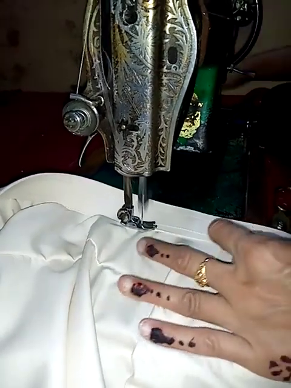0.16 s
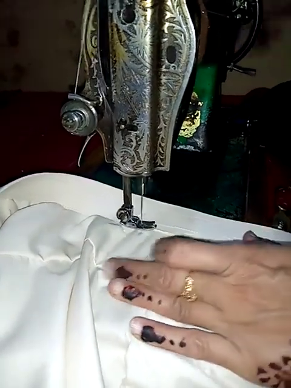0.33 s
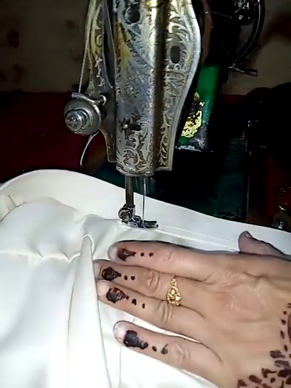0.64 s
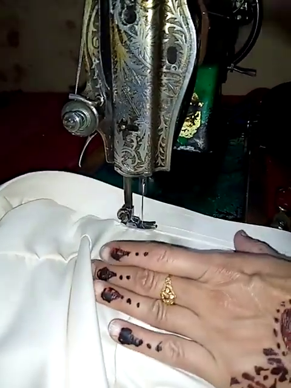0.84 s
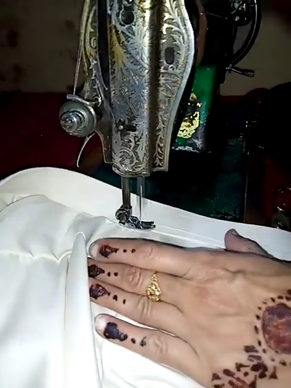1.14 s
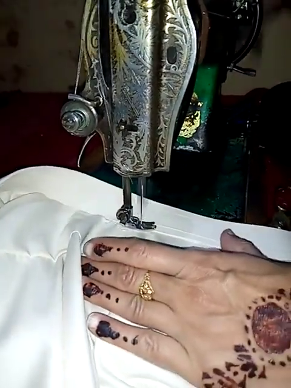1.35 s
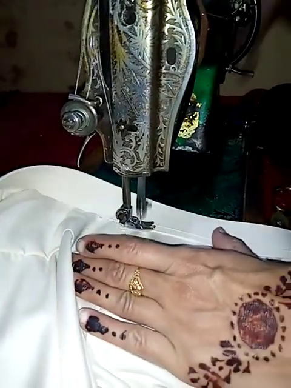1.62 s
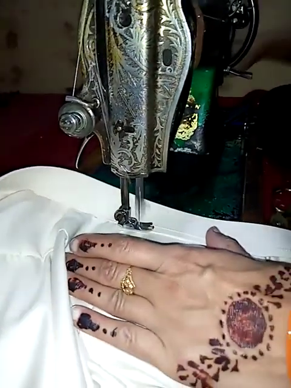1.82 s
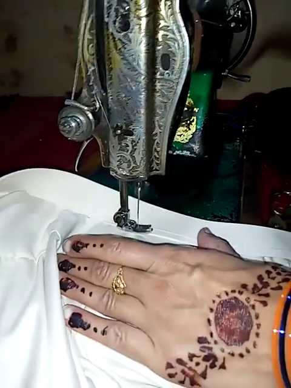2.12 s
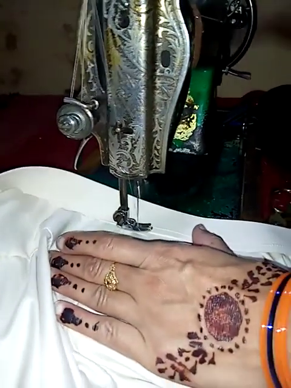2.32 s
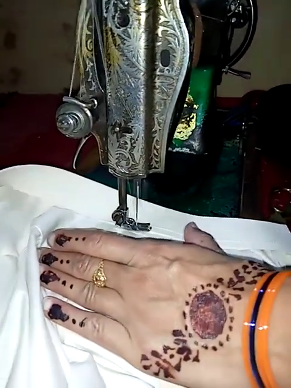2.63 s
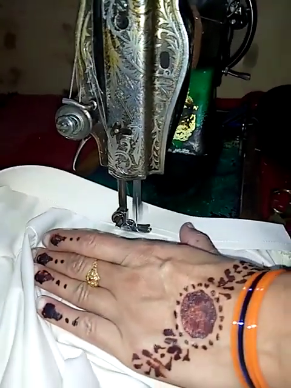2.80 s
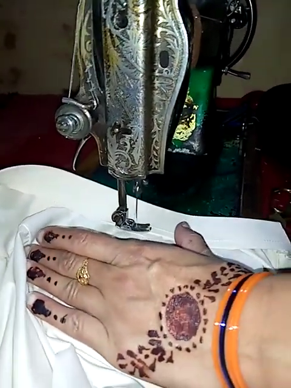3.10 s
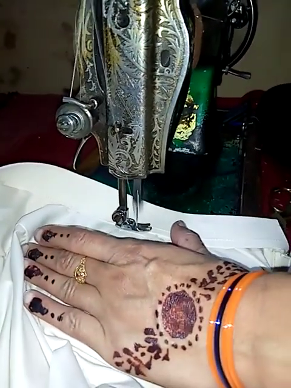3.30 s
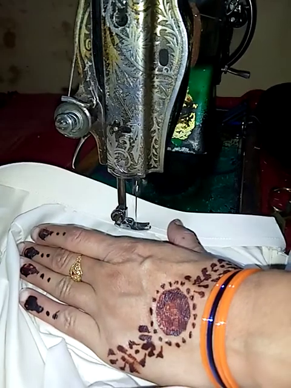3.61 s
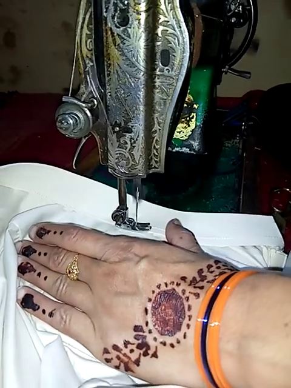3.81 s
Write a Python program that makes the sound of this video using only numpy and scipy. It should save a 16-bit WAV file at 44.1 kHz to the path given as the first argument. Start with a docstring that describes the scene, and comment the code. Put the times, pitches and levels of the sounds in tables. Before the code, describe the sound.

Sewing machine stitching close up: rapid metallic clicking and knocking that gathers pace, then winds down

```python
"""A faint rattle and low drone come first, with soft knocks: an old cast-iron sewing machine on a wooden table.
Heard close up, it gathers speed to between ten and eleven stitches a second, then slows and stops.
In each stitch the linkage clacks, the needle bar and shuttle click and the feed knocks the table;
now and then a loose steel part rings. Blows are bursts of random touches, coloured by filters and
joined by fading tones; the bearings' rattle and the table's drone are filtered noise."""
import sys
import numpy as np
from scipy import signal
from scipy.fft import rfft, irfft
from scipy.io import wavfile

SR = 44100
rng = np.random.default_rng(int(sys.argv[2]) if len(sys.argv) > 2 else 0)


def log_audio(samples):
    """Write samples as a 16-bit WAV file to the path given in sys.argv[1]."""
    # one column per channel
    frames = np.atleast_2d(samples).T
    # limit to full scale, then quantise
    limited = np.clip(frames, -1, 1)
    pcm = np.round(limited * 32767).astype(np.int16)
    wavfile.write(sys.argv[1], SR, pcm)


N = 174195  # length in samples, just under 4 s

# Blow levels below are inputs: each function adds its own trim in dB.
# Steel clicks of needle bar and shuttle, about two a stitch: start_s [s], treble_db [dB], body_db [dB]
CLICK_EVENTS = [(0.3633, -14.5, -29), (0.584, -34, -41), (0.6319, -12.5, -26.5), (0.668, -24, -39.5),
                (0.689, -19.5, -32), (0.7453, -6.5, -28.5), (0.7898, -16.5, -33.5), (0.8622, -9.5, -26.5),
                (0.9205, -15.5, -35.5), (0.9717, -10.5, -28.5), (1.0224, -14.5, -32), (1.075, -9.5, -26),
                (1.1291, -11, -33.5), (1.181, -9.5, -50), (1.233, -14.5, -30), (1.283, -9, -28),
                (1.331, -13.5, -30), (1.3807, -12, -27), (1.431, -10, -34), (1.48, -12.5, -28),
                (1.5313, -12, -29.5), (1.5752, -16.5, -32.5), (1.6242, -14, -31), (1.6713, -8.5, -28.5),
                (1.72, -10, -30), (1.767, -7, -30), (1.8164, -10.5, -30), (1.8595, -14.5, -29.5),
                (1.89, -17.5, -32.5), (1.9054, -15.5, -29), (1.9509, -13.5, -28.5), (1.999, -9.5, -32),
                (2.0468, -12.5, -28), (2.0953, -12, -33), (2.141, -13, -34), (2.1857, -11.5, -35.5),
                (2.233, -11.5, -28), (2.281, -14.5, -30), (2.3274, -11, -28.5), (2.3753, -13, -33),
                (2.4229, -14.5, -25.5), (2.4736, -17, -31.5), (2.521, -10, -31.5), (2.573, -10.5, -34),
                (2.6261, -9, -27.5), (2.6819, -14.5, -37), (2.7366, -10.5, -26), (2.7965, -13, -38),
                (2.921, -19, -37), (3.2794, -39, -36), (3.38, -43, -39), (3.423, -39, -45),
                (3.454, -38, -39), (3.648, -36, -39.5), (3.747, -42, -42.5), (3.909, -40, -43)]
# The feed knocking on the bed, about once a stitch: start_s [s], knock_db [dB], rattle_db [dB]
KNOCK_EVENTS = [(0.055, -37, -39), (0.073, -57, -36), (0.139, -35, -61), (0.227, -24, -29.5),
                (0.372, -30.5, -39), (0.501, -32, -40), (0.512, -46, -34.5), (0.633, -24.5, -26.5),
                (0.754, -29, -34), (0.872, -36, -40), (0.973, -26, -28.5), (1.081, -28, -41),
                (1.18, -33, -27.5), (1.285, -27.5, -28.5), (1.39, -30.5, -31.5), (1.482, -31.5, -28.5),
                (1.58, -26.5, -27.5), (1.677, -30.5, -29), (1.777, -30.5, -29), (1.863, -26.5, -30.5),
                (1.951, -37, -37), (2.053, -33, -30), (2.143, -26, -27.5), (2.238, -29, -31),
                (2.329, -40, -26), (2.428, -29.5, -39.5), (2.527, -29.5, -34), (2.662, -34, -30.5),
                (2.743, -30.5, -37), (2.863, -30.5, -38), (2.99, -28.5, -36), (3.128, -26, -35),
                (3.285, -30, -42), (3.462, -35.5, -39), (3.519, -38.5, -38.5), (3.662, -31.5, -38.5),
                (3.799, -49, -48.5), (3.917, -34, -42.5)]
# Ringing tones of the machine's head: pitch_hz [Hz], level_db [dB], t60_s [s to fall by 60 dB]
HEAD_TONES = [(1212,7,0.11),(2307,2,0.08),(3123,5,0.033),(4210,6,0.05),(5835,3,0.3),(6400,1,0.04)]


def from_db(db):
    """Turn decibels into an amplitude gain."""
    return 10 ** (np.asarray(db) / 20)


def rms_one(x):
    """Scale a signal to an rms (average strength) of 1."""
    return x / np.sqrt(np.mean(x ** 2) + 1e-20)


def level(rows):
    """Draw a gain over time through (start_s, level_db) points."""
    return from_db(np.interp(np.arange(N) / SR, *np.transpose(rows)))


def body(x, colour, modes=(), size=16384):
    """Pass x through a part with a broad colour and ringing modes; the filter's overall power gain is 1."""
    hz, db = np.transpose(colour)
    grid_hz = np.maximum(np.arange(size // 2 + 1) * SR / size, 1)
    colour_gain = from_db(np.interp(np.log(grid_hz), np.log(hz), db))
    # Folding the cepstrum (spectrum of the log spectrum) makes the filter respond only after a blow
    cepstrum = irfft(np.log(colour_gain))
    cepstrum[1:size // 2] *= 2
    cepstrum[size // 2 + 1:] = 0
    contact = irfft(np.exp(rfft(cepstrum)))
    response = contact
    for mode_hz, mode_db, t60_s in modes:
        r = np.exp(-np.log(1000) / (t60_s * SR))  # fading per sample
        poles = [1, -2 * r * np.cos(2 * np.pi * mode_hz / SR), r * r]
        ringing = (1 - r * r) / 2 * signal.lfilter([1, 0, -1], poles, contact)
        response = response + from_db(mode_db) * ringing
    return signal.fftconvolve(x, response / np.linalg.norm(response))[:N]


def blows(times, db, attack_s, hold_s, decay_s, tail_db, tail_s):
    """Each blow is a short burst of dense contact chatter, with a diffuse tail from frame and room."""
    touches_per_s = 9000  # tiny touches within a blow
    t = np.arange(SR // 3) / SR
    rise = np.minimum(t / attack_s, 1) ** 2
    late = np.maximum(t - attack_s - hold_s, 0)
    burst = np.exp(-2 * late / decay_s)
    tail = from_db(tail_db) ** 2 * np.exp(-2 * t / tail_s)
    shape = rise * (burst + tail)  # power, so overlapping blows add naturally
    power = np.zeros(N + SR)
    for s, gain in zip(times, from_db(db)):
        start = max(int(s * SR), 0)
        power[start:start + len(t)] += gain ** 2 * shape
    touches = (rng.random(N) < touches_per_s / SR) * rng.choice([-1, 1], N)
    return np.sqrt(power[:N]) * rms_one(touches)


def sing(times, db, modes, wander=0):
    """Each blow rings every mode with a strength of its own; wander is the typical pitch stray as a share."""
    strength_spread_db, rise_s = 2.5, .003
    hz, mode_db, t60_s = np.transpose(modes)[:, :, None]
    t = np.arange(int(t60_s.max() * SR)) / SR
    out = np.zeros(N + SR)
    for s, blow_db in zip(times, db):
        strength, stray, phase = rng.standard_normal((3, len(modes), 1))
        fade = np.exp(-np.log(1000) * t / t60_s)
        gain = from_db(blow_db + mode_db + strength_spread_db * strength) * fade
        tones = gain * np.sin(2 * np.pi * (hz * (1 + wander * stray) * t + phase))
        start = max(int(s * SR), 0)
        out[start:start + len(t)] += tones.sum(0) * np.minimum(t / rise_s, 1)
    return out[:N]


def judder():
    """Small parts bounce, so their rattle comes in quick uneven clumps: a gain of rms 1."""
    spread_db, points_per_s = 3, 330
    points = rng.standard_normal(int(N / SR * points_per_s) + 2)
    wobble = np.interp(np.arange(N) / SR * points_per_s, np.arange(len(points)), points)
    return rms_one(from_db(spread_db * wobble))


def running():
    """Bearings rub and tick faintly; the table drones with the shaking of the machine."""
    # How strong the bearings' rattle and the table's drone are, before trim: start_s [s], level_db [dB]
    bearing_levels = [(0,-57),(.2,-50),(.3,-46.5),(.6,-46.5),(.9,-43.5),(2.4,-40),(3.1,-46),(3.42,-54),(3.62,-53),(3.72,-59),(3.8,-61),(3.95,-57.5)]
    drone_levels = [(0,-60.5),(.22,-49),(1,-45.5),(2.3,-44.5),(3.1,-48),(3.55,-53),(3.82,-62)]
    # Their colours: pitch_hz [Hz], level_db [dB]
    bearing_colour = [(450,-8.5),(600,1.5),(800,-3.5),(1500,-1),(2200,1.5),(3000,-3.5),(5000,-1),(6600,-2),(7700,-16.5),(9600,-9.5),(13300,-16),(15200,-10),(16200,-24)]
    drone_colour = [(50,-33),(85,-34),(108,-6.5),(145,-9.5),(220,-5.5),(310,3),(440,-6.5),(560,-4.5),(800,-28),(2000,-43.5)]
    bearing_trim_db, drone_trim_db = 1, -0.5
    ticks_per_s, tick_spread_db, tick_top_db = 280, 9, 11
    tick_share = 0.47  # ticks' share of the power; smooth noise makes up the rest

    tick_db = np.minimum(tick_spread_db * rng.exponential(1, N), tick_top_db)
    born = np.flatnonzero(rng.random(N) < ticks_per_s / SR)
    ticks = blows(born / SR, tick_db[born], attack_s=0.00033, hold_s=0.00025,
                  decay_s=0.0085, tail_db=-9, tail_s=0.0074)
    smooth = rng.standard_normal(N)
    rub = np.sqrt(tick_share) * rms_one(ticks) + np.sqrt(1 - tick_share) * smooth
    bearings = body(rub * judder() * level(bearing_levels), bearing_colour, HEAD_TONES)
    drone = body(rng.standard_normal(N) * level(drone_levels), drone_colour)
    return from_db(bearing_trim_db) * bearings + from_db(drone_trim_db) * drone


def knocks():
    """The feed strikes the bed, sets it ringing and shakes the small parts on it."""
    # Colours of the knock and of the shaken parts: pitch_hz [Hz], level_db [dB]
    knock_colour = [(120,-24),(430,-5),(570,7.5),(740,-9),(1000,0.5),(1250,0.5),(1450,-12),(2200,-1),(3500,-6.5),(8000,-37)]
    rattle_colour = [(1000,-25),(2200,5),(3200,5),(4600,6),(5300,-1),(6700,6),(7600,-6),(9500,-4.5),(13500,-6),(15300,2),(16200,-29)]
    # Ringing tones of the bed: pitch_hz [Hz], level_db [dB, before trim], t60_s [s]
    bed_tones = [(485,-16.5,.17),(601,-14,.13),(1216,-15,.17),(1268,-17,.085),(2110,-17,.06),(2320,-20,.05)]
    bed_trim_db = 0.5

    s, knock_db, rattle_db = np.transpose(KNOCK_EVENTS)
    knock = blows(s, knock_db - 8, attack_s=0.0016, hold_s=0.0018,
                  decay_s=0.012, tail_db=-17.0, tail_s=0.11)
    rattle = blows(s, rattle_db - 2.0, attack_s=0.00034, hold_s=0.00088,
                   decay_s=0.011, tail_db=-8.0, tail_s=0.038)
    bed = body(knock, knock_colour) + sing(s, knock_db + bed_trim_db, bed_tones)
    return bed + body(rattle * judder(), rattle_colour)


def table():
    """Each feed knock and each click gives the table top one soft push, so it throbs with the stitches."""
    # Boom relative to each knock, heavier as the machine slows: start_s [s], level_db [dB, before trim]
    boom_levels = [(.2,-10),(.7,-9),(1,-6),(2.6,-5),(3.0,-4),(3.13,1),(3.29,2),(3.46,8),(3.66,-5)]
    # Colour of the thud: pitch_hz [Hz], level_db [dB]
    thud_colour = [(100,-10.5),(290,-4),(420,-7.5),(900,-16)]
    # Ringing tones of the table, then its lowest one, reached only by the feed:
    # pitch_hz [Hz], level_db [dB], t60_s [s]
    table_tones = [(296,19,0.16),(320,22,0.18),(349,20.5,0.28),(383,22.5,0.26)]
    boom_tone = [(272,-8.5,.2)]
    click_push_db, knock_push_db = 14.5, 11.5

    push = np.zeros(N)
    s, _, click_db = np.transpose(CLICK_EVENTS)
    # Clicks push up or down at random; knocks always push the same way
    push[(s * SR).astype(int)] += from_db(click_db + click_push_db) * rng.choice([-1, 1], len(s))
    s, knock_db, _ = np.transpose(KNOCK_EVENTS)
    boom_db = knock_db + np.interp(s, *np.transpose(boom_levels))
    push[(s * SR).astype(int)] += from_db(boom_db + knock_push_db)
    return body(push, thud_colour, table_tones) + sing(s, boom_db, boom_tone)


def clacks():
    """The linkage takes up its play with a short hollow clack, pitched a little differently each time."""
    # Play is taken up before and after the stroke: start_s [s], level_db [dB, before trim]
    clack_events = [(0.1673, -25.5), (0.309, -28), (0.3436, -22.5), (0.3705, -18.5), (0.485, -29.5),
                    (0.6425, -16), (0.7287, -23), (0.7537, -21), (0.847, -25), (0.872, -18), (0.9587, -24),
                    (0.9816, -20.5), (1.0606, -19.5), (1.167, -20), (1.188, -16.5), (1.27, -22),
                    (1.291, -21), (1.367, -18.5), (1.3862, -22.5), (1.467, -24.5), (1.5645, -18),
                    (1.5867, -21), (1.658, -20.5), (1.754, -19.5), (1.775, -17), (1.8473, -16.5),
                    (1.939, -17.5), (2.0328, -18.5), (2.054, -26), (2.127, -14), (2.2191, -13.5),
                    (2.313, -21), (2.409, -23), (2.507, -23), (2.611, -24), (2.7205, -23), (2.7455, -24),
                    (2.839, -24), (2.9658, -25), (3.1034, -21.5), (3.25, -37), (3.4474, -28.5),
                    (3.571, -34)]
    # Colour of the contact: pitch_hz [Hz], level_db [dB]
    clack_colour = [(300,-26.5),(650,-1.5),(1400,-19),(1950,-11.5),(2250,-5.5),(2850,-3.5),(3200,6.5),(3700,-16.5),(4200,-3.5),(5400,-20.5),(6600,-4.5),(8000,-18),(15000,-17.5)]
    # Ringing tones of the linkage: pitch_hz [Hz], level_db [dB, before trim], t60_s [s]
    link_tones = [(2160,-16,.022),(2370,-18,.022),(2760,-15,.018),(2900,-13,.024),(4230,-17,.02)]
    link_trim_db = 8

    s, db = np.transpose(clack_events)
    contact = blows(s, db - 13, attack_s=0.0013, hold_s=0.0015,
                    decay_s=0.0034, tail_db=-9.5, tail_s=0.011)
    return body(contact, clack_colour) + sing(s, db + link_trim_db, link_tones, wander=.025)


def clicks():
    """Steel meets steel: a very short bright snap and a slightly longer answer from the head."""
    # Colours of the snap and of the answer: pitch_hz [Hz], level_db [dB]
    snap_colour = [(3000,-17),(8000,-18),(8500,-9),(8900,-16),(9350,-3.5),(10400,-2),(11000,-8.5),(12100,-10),(12600,-4.5),(13800,-20),(14400,-8),(15500,-7),(16000,-21)]
    answer_colour = [(100,-35),(600,1),(1600,-8.5),(2300,-3),(3100,3.5),(3700,-2),(4200,-3.5),(5400,-5.5),(6450,4),(7400,-14),(10000,-28.5)]
    # Ringing tones of the shuttle: pitch_hz [Hz], level_db [dB], t60_s [s]
    shuttle_tones = [(9370,1,0.03),(10686,-1,0.05)]

    s, treble_db, body_db = np.transpose(CLICK_EVENTS)
    snap = blows(s, treble_db - 12, attack_s=0.00069, hold_s=0.00082,
                 decay_s=0.0024, tail_db=-14, tail_s=0.019)
    answer = blows(s, body_db - 2, attack_s=0.0012, hold_s=0.00054,
                   decay_s=0.0086, tail_db=-7.5, tail_s=0.0083)
    return body(snap, snap_colour, shuttle_tones) + body(answer, answer_colour, HEAD_TONES)


def rings():
    """The loose steel part is struck, falls back once and sings on in its ringing modes."""
    # Strikes on the loose part: start_s [s], level_db [dB, before trim]
    ring_events = [(0.4225, -20), (0.7995, -20), (1.117, -18.5), (1.4226, -19), (1.71, -18.5),
                   (1.9893, -18.5), (2.271, -17), (2.4613, -18), (2.5625, -19.5), (2.6613, -19),
                   (2.783, -19.5), (2.908, -21), (3.03, -17), (3.189, -25.5), (3.3485, -22), (3.5157, -23)]
    # Colour of the strike: pitch_hz [Hz], level_db [dB]
    ring_colour = [(150,-33.5),(600,-8),(1500,-13),(3800,-6),(5400,-4.5),(6500,-4),(8000,-15),(10700,-12),(11200,3.5),(11800,-12.5),(13900,-20),(14280,1),(14520,4),(14830,4.5),(15200,-5),(15600,-5),(16100,-18)]
    # Ringing tones of the loose steel: pitch_hz [Hz], level_db [dB, before trim], t60_s [s]
    steel_tones = [(3750,-27,.26),(4595,-28,.27),(5836,-26.5,.28),(11115,-26,.22),(11300,-25,.24),(14215,-25,.22),(14280,-25,.15),(14745,-24,.18),(14838,-23.5,.2)]
    bounce_s, bounce_db, steel_trim_db = 0.0126, -9, 1.5

    s, db = np.transpose(ring_events)
    strike_s = np.r_[s, s + bounce_s]
    strike_db = np.r_[db, db + bounce_db]
    strikes = blows(strike_s, strike_db - 7.5, attack_s=.0007, hold_s=0.0018,
                    decay_s=0.0061, tail_db=-18, tail_s=0.069)
    return body(strikes, ring_colour) + sing(s, db + steel_trim_db, steel_tones)


def scene():
    """Add all parts of the machine at one close microphone."""
    return (running() + knocks() + table() + clacks() + clicks() + rings())[None]


def record(dry):
    """The small microphone loses the deep bass; the top is cut steeply."""
    low_hz, top_hz = 75, 16000
    bass_cut = signal.butter(2, low_hz, "high", fs=SR, output="sos")
    top_cut = signal.ellip(10, .1, 80, top_hz, fs=SR, output="sos")  # 0.1 dB ripple, 80 dB cut
    thin = signal.sosfilt(bass_cut, dry)
    return signal.sosfilt(top_cut, thin)


dry = scene()
out = record(dry)
log_audio(out)
```